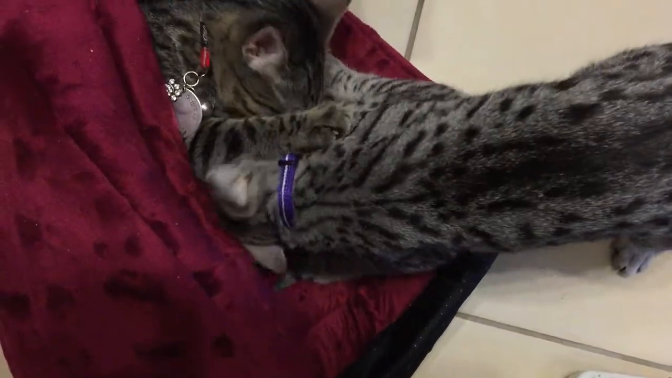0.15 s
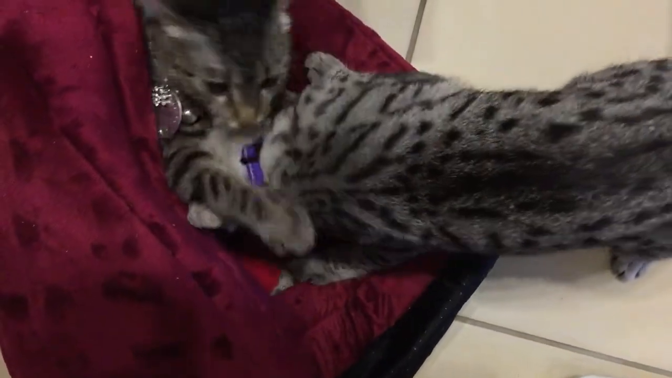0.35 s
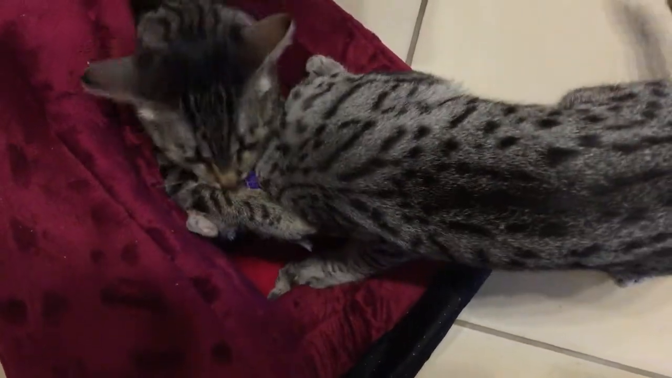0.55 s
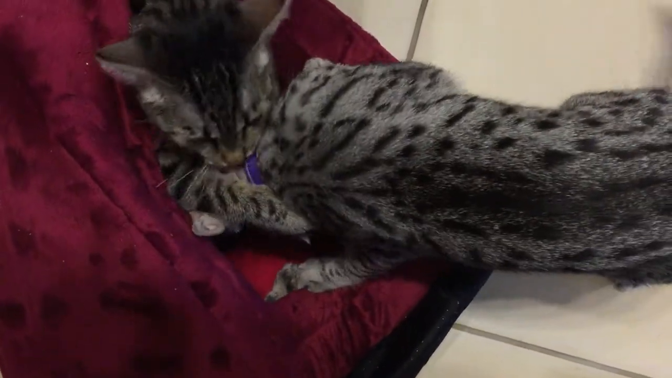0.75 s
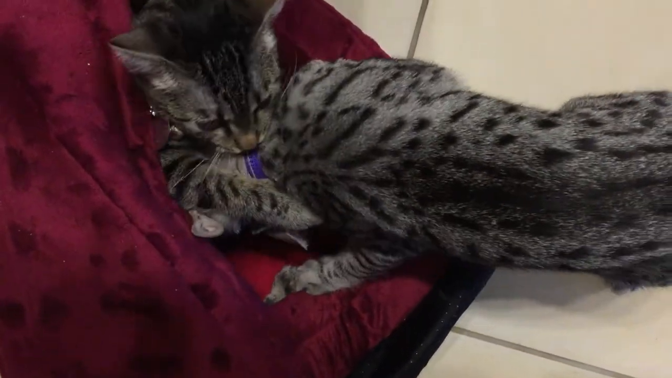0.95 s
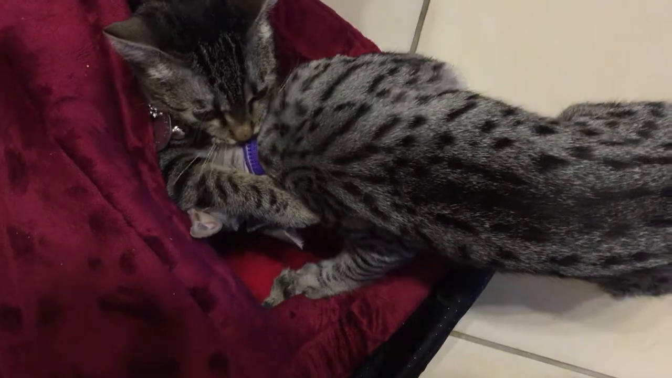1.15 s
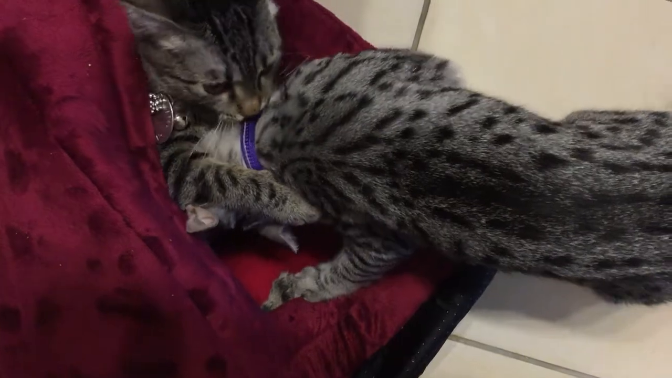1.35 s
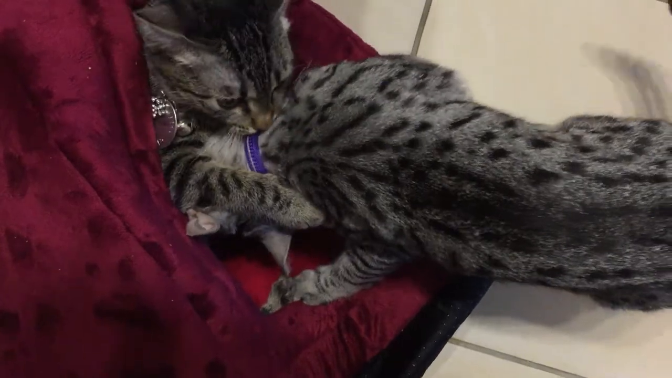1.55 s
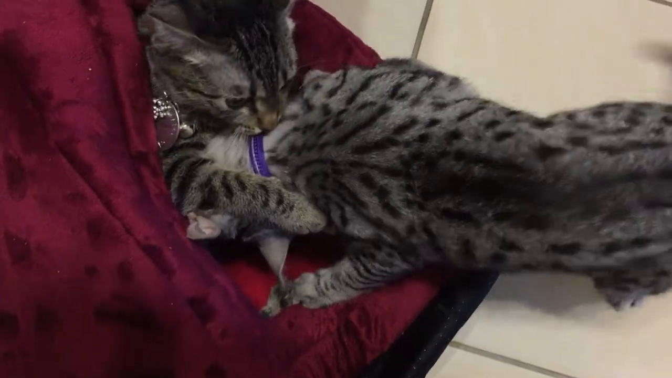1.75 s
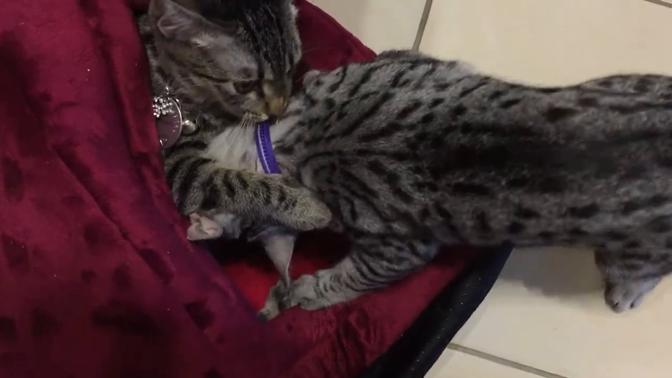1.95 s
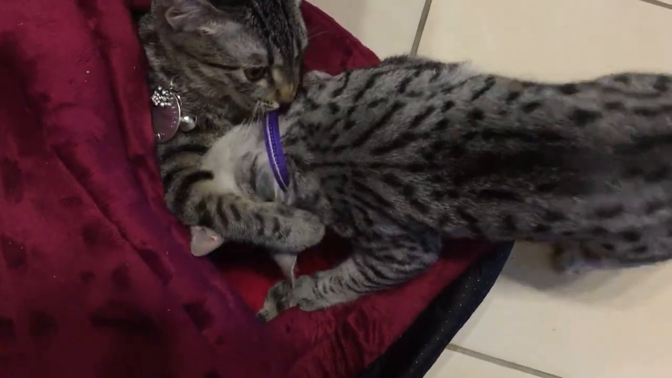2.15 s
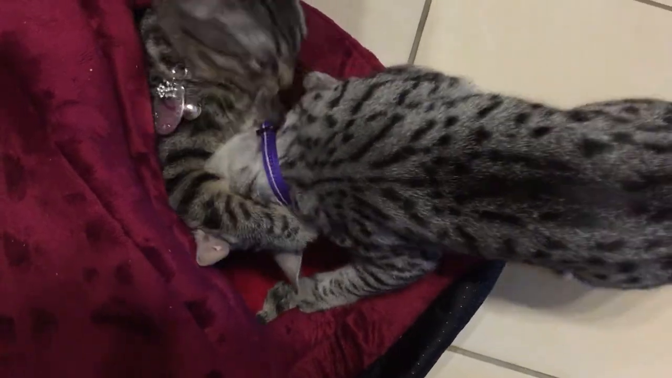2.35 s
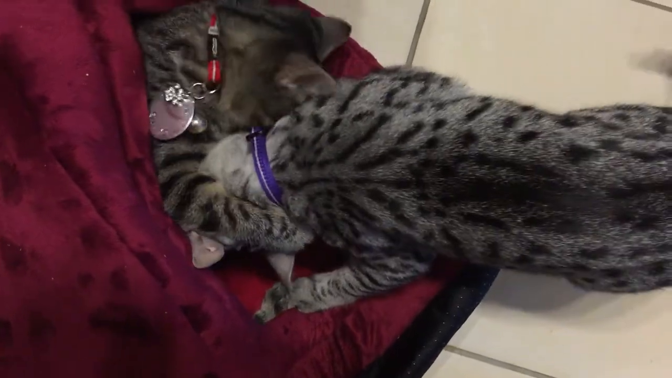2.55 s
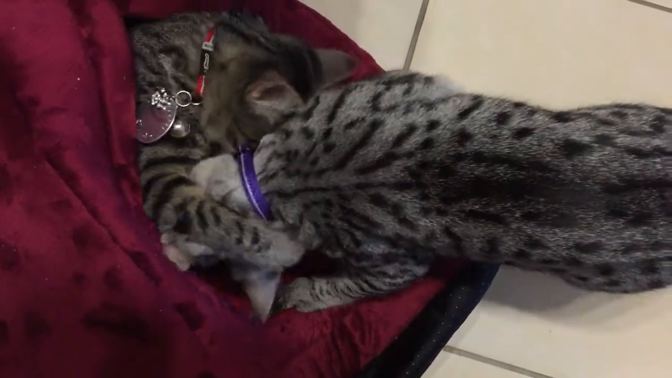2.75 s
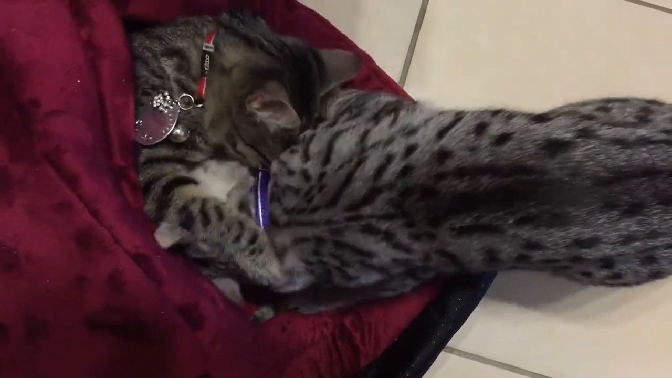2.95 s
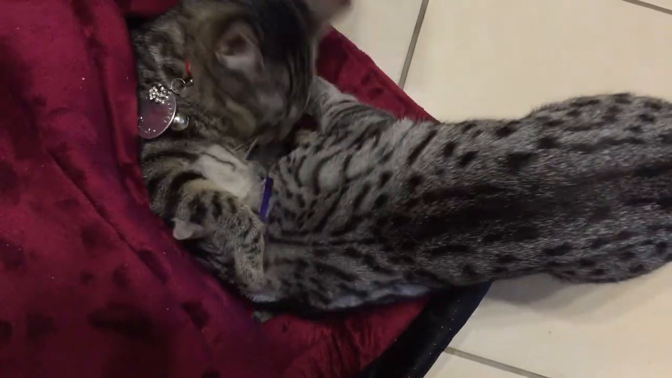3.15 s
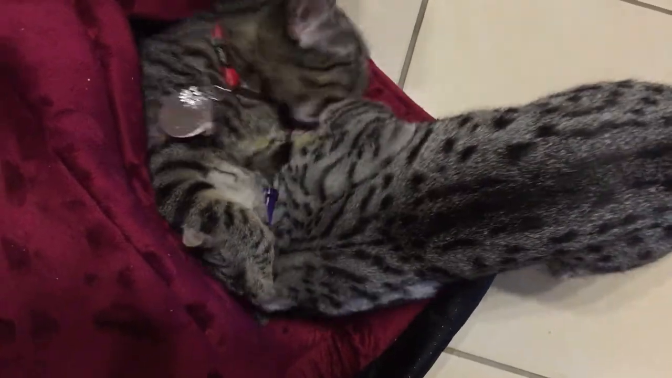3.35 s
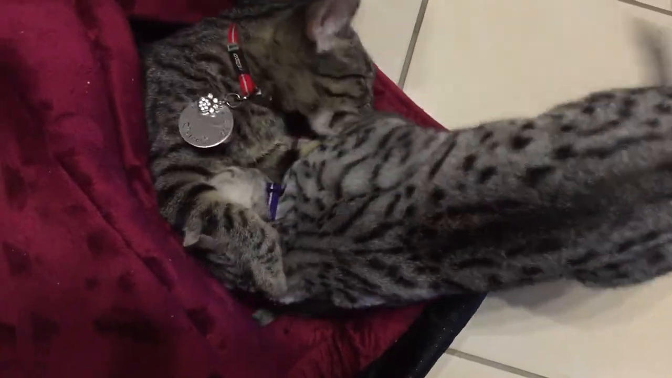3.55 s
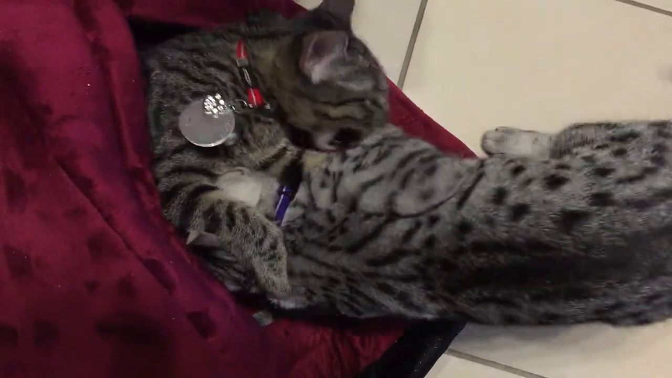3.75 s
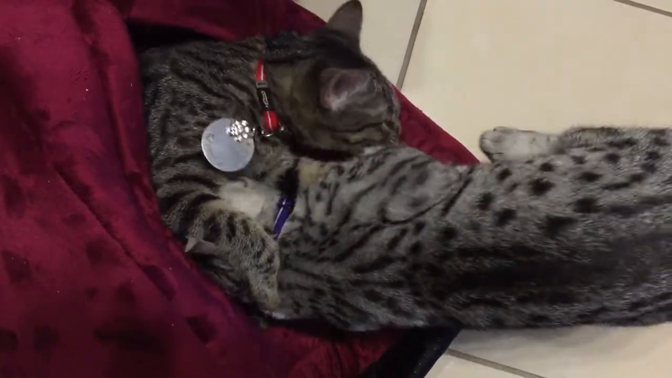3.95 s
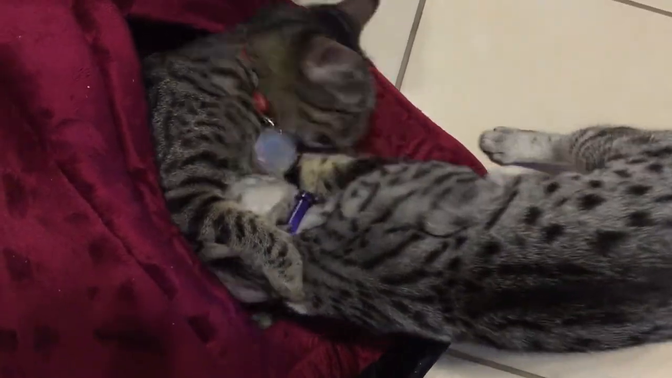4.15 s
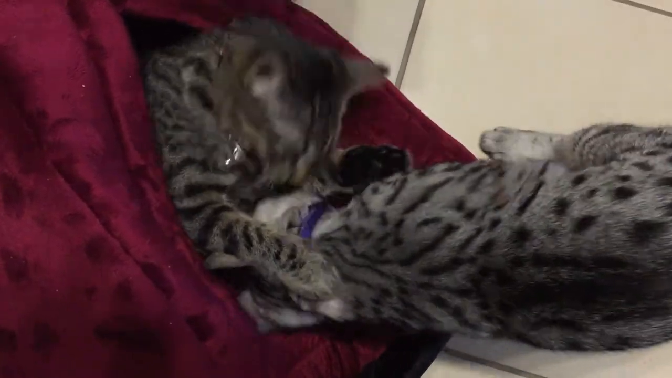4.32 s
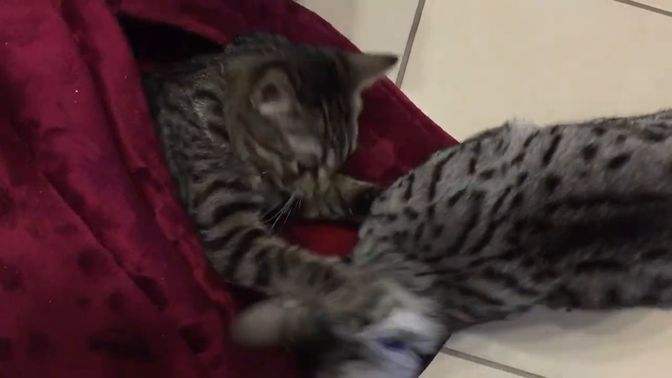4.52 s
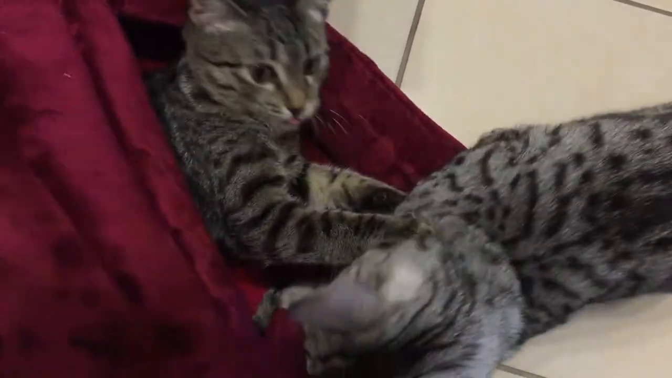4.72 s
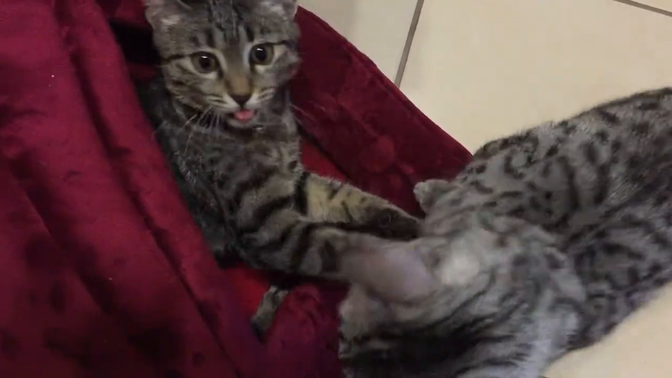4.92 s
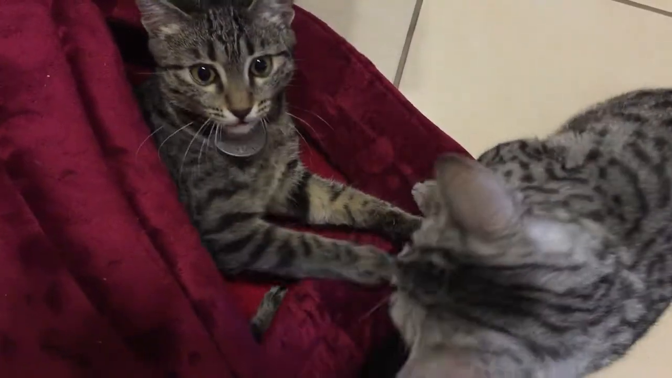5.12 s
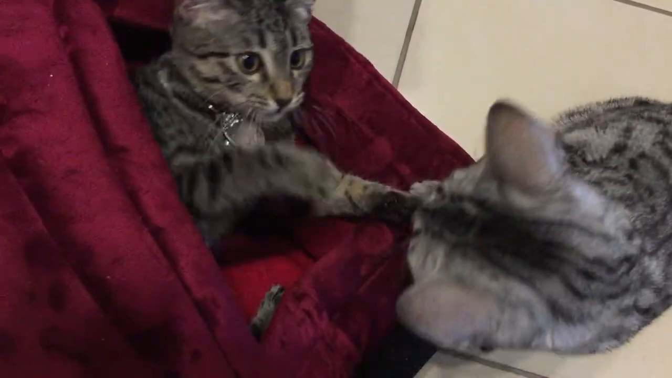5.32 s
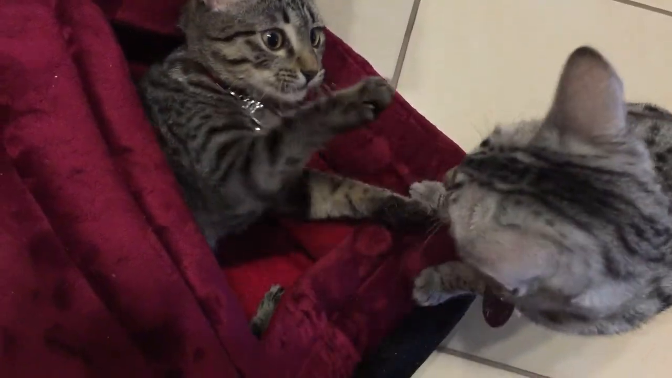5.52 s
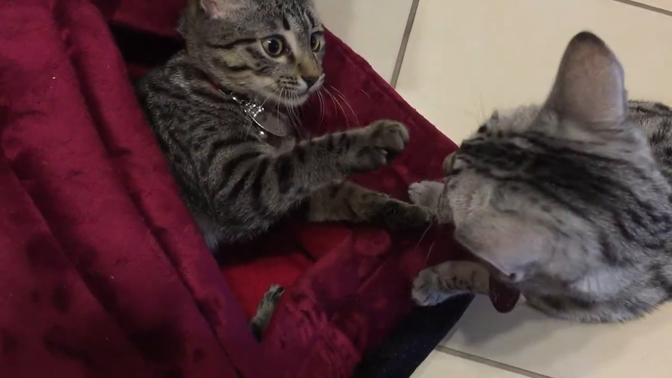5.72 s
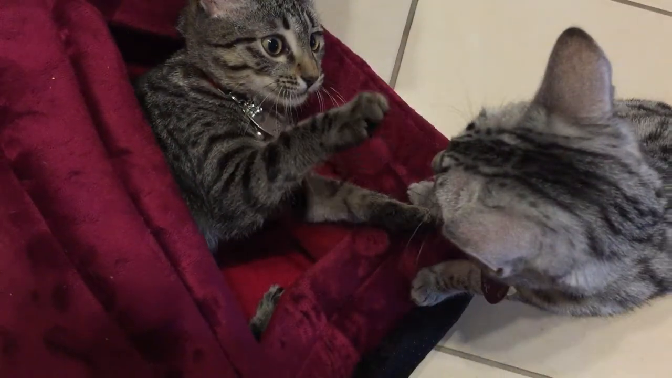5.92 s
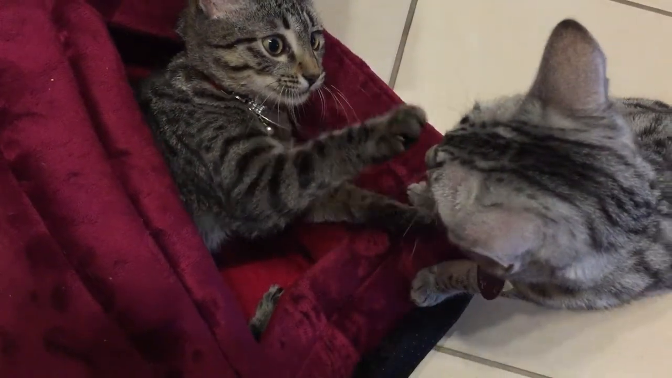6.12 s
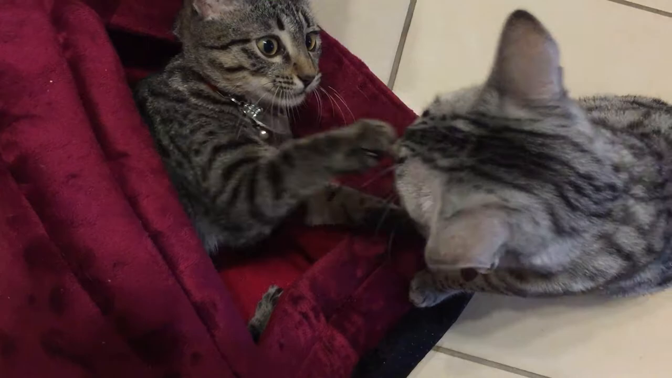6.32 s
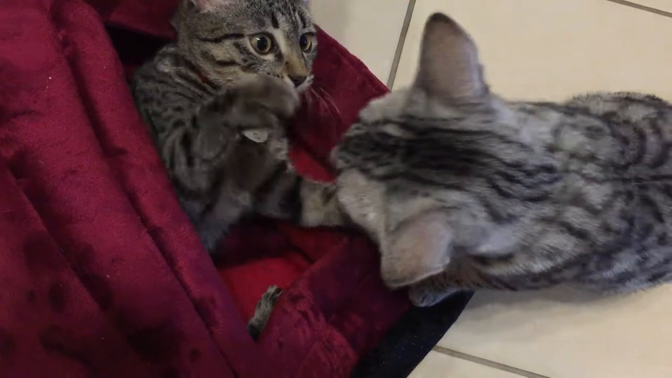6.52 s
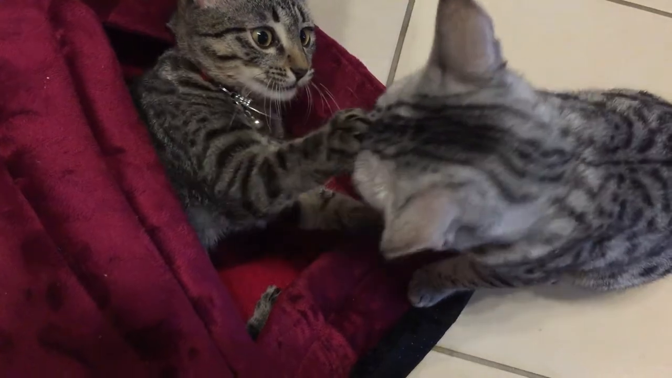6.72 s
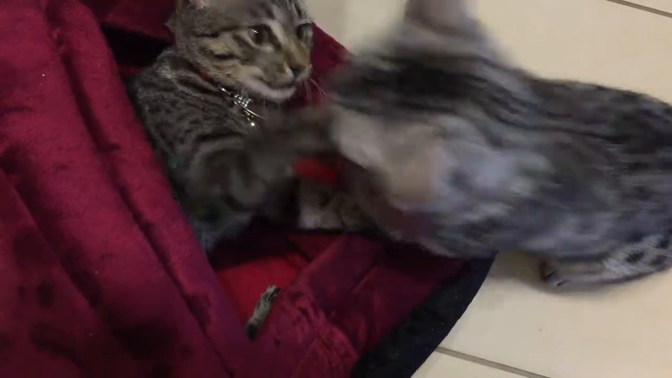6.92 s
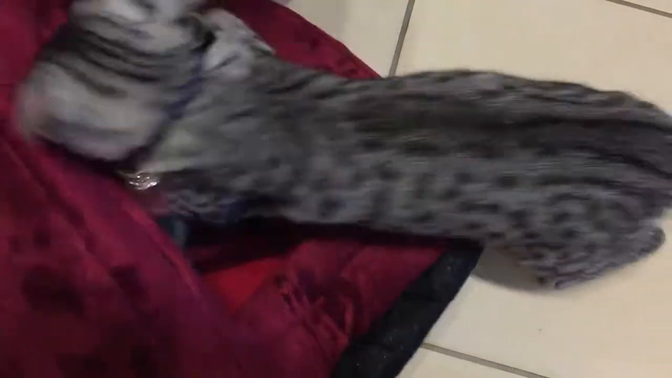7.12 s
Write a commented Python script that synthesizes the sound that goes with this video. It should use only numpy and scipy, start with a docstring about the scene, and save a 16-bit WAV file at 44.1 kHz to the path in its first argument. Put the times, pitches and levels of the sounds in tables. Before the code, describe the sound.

A quiet tiled room: low rumble, faint hiss and a steady, slightly wavering refrigerator hum throughout. Close to the microphone, a kitten's collar tag clinks thinly and very high at 0-0.2 s, then tag and small bell jingle together at 0.4-0.6 s, with a faint touch near 0.8. From about 1.6 s fur brushes plush and a soft, raspy low growl pulses; claws snap free of threads at 2.1 and 2.3. Light bell ticks start at 2.5, and a stronger growl runs from 2.7 to 3.4, opening brighter at its end. Tinkles and clinks gather at 3.5-3.8 around a soft paw pat. At 4.2-4.7 comes a dense, bright jangle with scratchy claw drags. Sparser bell notes and scuffs continue to 5.4, then mostly hum. Light tinkling at 6.8 leads to the loudest, sharpest collar rattle from 7.0 s to the end.

```python
"""Metal clinks and a small bell's jingle, close to the microphone: the collar of one of two kittens
wrestling in a plush cat bed on a tiled floor. Tag and bell are banks of ringing modes set off by clicks.
Claws and fur on the fabric are shaped noise; a low growl is slow pulses through throat resonances.
Behind them a refrigerator compressor hums in steady sines, over coloured noise for the room's rumble and hiss."""
import sys
import numpy as np
from scipy import signal
from scipy.fft import rfft, irfft
from scipy.io import wavfile

SR = 44100
rng = np.random.default_rng(int(sys.argv[2]) if len(sys.argv) > 2 else 0)


def master_out(mix):
    """Clip the mix to full scale and print it as 16-bit PCM to the path in sys.argv[1]."""
    frames = np.transpose(np.atleast_2d(mix))
    ceiling = np.clip(frames, -1, 1)
    pcm = np.round(ceiling * 32767).astype(np.int16)
    wavfile.write(sys.argv[1], SR, pcm)


N = 316197

# modes of the small steel bell: pitch_hz, relative level_db, t60_s
BELL = [(4339, 3, 0.041), (4430, 2, 0.07), (4530, 0, 0.045), (4920, -13, 0.025), (5100, -0.5, 0.01),
        (5580, -10.5, 0.077), (6500, -28, 0.059), (7500, -14, 0.047), (11350, -6, 0.068),
        (11570, -8, 0.049), (13000, -17, 0.074)]
# modes of the tag and its split ring: pitch_hz, relative level_db, t60_s
TAG = [(6600, -2.5, 0.006), (7020, -4, 0.0087), (13100, -2.5, 0.035), (13600, -17, 0.059),
       (13850, -15, 0.045), (14600, 5, 0.023), (14700, -9, 0.07), (15000, -28, 0.015)]
# colour of metal touching metal: frequency_hz, relative density_db (per Hz)
CONTACT = [(600, -54), (1500, -8.5), (2500, 0), (3600, -1), (5500, 4), (7000, 3), (9000, 8), (12000, -1),
           (15500, -40.5)]
BELL_HZ = 4457  # the bell's main note, before its spread from hit to hit


def from_db(db):
    """Decibels to amplitude gain."""
    return 10 ** (np.asarray(db) / 20)


def rms_one(x):
    """Scale to rms 1."""
    return x / np.sqrt(np.mean(x ** 2) + 1e-20)


def gains(rows):
    """One gain curve for each dB column, practically silent outside the rows."""
    s, *columns = np.transpose(rows)
    t = np.arange(N) / SR
    return np.array([from_db(np.interp(t, s, c, left=-150, right=-150)) for c in columns])


def noise(spectrum):
    """Steady noise of a given colour, rms 1."""
    hz, db = np.transpose(spectrum)
    bins = np.maximum(np.fft.rfftfreq(N, 1 / SR), 1)
    colour = from_db(np.interp(np.log(bins), np.log(hz), db))
    return rms_one(irfft(rfft(rng.standard_normal(N)) * colour, N))


def drift(rate):
    """Random wander of rms 1, with rate new values per second joined by straight lines."""
    knots = rng.standard_normal(4096)
    return rms_one(np.interp(np.arange(N) / SR * rate, np.arange(len(knots)), knots))


def bandpass(x, low_hz, high_hz):
    """Keep the band between two frequencies."""
    return signal.sosfilt(signal.butter(2, [low_hz, high_hz], "band", fs=SR, output="sos"), x)


def ring(clicks, hz, t60):
    """A damped mode: each unit click starts a sine of height 1 that falls 60 dB in t60 seconds."""
    r = from_db(-60 / (t60 * SR))
    w = 2 * np.pi * hz / SR
    return signal.lfilter([0, np.sin(w)], [1, -2 * r * np.cos(w), r * r], clicks + 1e-18)


def resonate(x, hz, width):
    """A resonance with gain 1 at its top; width in Hz."""
    r = np.exp(-np.pi * width / SR)
    feedforward = np.array([1, 0, -1]) * (1 - r * r) / 2
    feedback = [1, -2 * r * np.cos(2 * np.pi * hz / SR), r * r]
    return signal.lfilter(feedforward, feedback, x + 1e-18)


def die_away(clicks, seconds):
    """Each click becomes an exponential decay from its height, with this time constant."""
    return signal.lfilter([1], [1, -np.exp(-1 / (seconds * SR))], clicks + 1e-18)


def swell(start, length, attack, release):
    """An envelope that rises, holds until the length is over and dies away; all in seconds."""
    age = np.arange(N) / SR - start
    return np.clip(age / attack, 0, 1) * np.exp(-np.maximum(age - length, 0) / release)


def impulses(s, db):
    """One click for each event."""
    out = np.zeros(N)
    out[np.clip((s * SR).astype(int), 0, N - 1)] = from_db(db)
    return out


def bouncing(clicks, per_s, seconds):
    """The dying run of light touches that follows each hit."""
    return (rng.random(N) < per_s / SR) * die_away(clicks, seconds)


def grains(per_s, spread_db):
    """Random tiny touches of uneven size."""
    sizes = from_db(spread_db * np.minimum(rng.exponential(1, N), 3))
    return (rng.random(N) < per_s / SR) * sizes


def struck(clicks, modes, uneven_db):
    """Every touch lands on another spot, so each mode gets a strength and sign of its own."""
    at, out = np.flatnonzero(clicks), np.zeros(N)
    for hz, db, t60 in modes:
        strength = from_db(db + uneven_db * (2 * rng.random(len(at)) - 1.5))
        blows = np.zeros(N)
        blows[at] = clicks[at] * strength * rng.choice([-1, 1], len(at))
        out += ring(blows, hz, t60)
    return out


def spot_ring(times, levels_db, pitches_hz, seconds, cluster_s):
    """The partial each contact spot favours, fed by a quick cluster of touches and damped by fur."""
    out, age = np.zeros(N + SR), np.arange(SR // 5) / SR
    for s, db, hz in zip(times, levels_db, pitches_hz):
        cluster = rng.standard_normal(len(age)) * np.exp(-age / cluster_s)
        tone = ring(cluster, hz, seconds)
        start = int(s * SR)
        out[start:start + len(age)] += from_db(db) * tone / np.abs(tone).max()
    return out[:N]


def chatter(clicks, seconds, spread_db):
    """Bursts of metal-on-metal noise; each contact spot favours different frequency bands."""
    at, out = np.flatnonzero(clicks), np.zeros(N)
    hiss = noise(CONTACT)
    edges_hz = np.geomspace(1000, 16000, 17)
    for low, high in zip(edges_hz, edges_hz[1:]):
        blows = np.zeros(N)
        blows[at] = clicks[at] * from_db(spread_db * (2 * rng.random(len(at)) + 1))
        out += bandpass(hiss, low, high) * die_away(blows, seconds)
    return out


def fibres(s, db, hz, width, swell_s):
    """Fibres slip and give: a short swell of noise around one pitch."""
    out, age, start = np.zeros(N + SR), np.arange(SR // 4) / SR, int(s * SR)
    slip = resonate(resonate(rng.standard_normal(len(age)), hz, width), hz, 2 * width)
    envelope = age / swell_s * np.exp(1 - age / swell_s)  # peaks at 1 after swell_s
    out[start:start + len(age)] = from_db(db) * rms_one(slip) * envelope
    return out[:N]


def fibre_bands(events, bands, swell_s):
    """Each event makes fibres sound in several bands at once."""
    return sum(fibres(s, db + band_db, hz, width, swell_s) for s, db in events for hz, width, band_db in bands)


def room_air():
    """Low rumble of the house, swelling at the room's standing waves, under a faint hiss."""
    # colour of the rumble: frequency_hz, relative density_db (per Hz)
    rumble_colour = [(25, -27), (40, 0.5), (62, -14.5), (80, -0.5), (150, 0.5), (200, -3.5), (300, -11.5),
                     (450, -14), (750, -23), (1500, -39)]
    # colour of the hiss: frequency_hz, relative density_db (per Hz)
    air_colour = [(410, -17), (700, -10), (1400, -8.5), (2080, -10.5), (3030, -14), (3550, -5.5),
                  (3840, -15.5), (4860, -19.5), (5990, -18), (14600, -51), (16000, -13.5)]
    # standing waves: pitch_hz, width_hz, gain_db of the resonance
    room_modes = [(80.9, 2.2, 18), (104.6, 7.2, 17), (127.8, 9, 15), (144.1, 4.6, 8), (177.4, 15, 9),
                  (247, 2.4, 10.5)]
    rumble_db, air_db = -48.5, -68.5  # rms levels
    rumble = noise(rumble_colour)
    for hz, width, db in room_modes:
        rumble = rumble + from_db(db) * resonate(noise(rumble_colour), hz, width)
    rumble = signal.sosfilt(signal.butter(2, 55, "high", fs=SR, output="sos"), rumble)
    return from_db(rumble_db) * rms_one(rumble) + from_db(air_db) * noise(air_colour)


def refrigerator(waver=0.63):
    """Steady compressor tones, each wavering in phase (waver in radians rms)."""
    # compressor tones: pitch_hz, level_db (rms)
    hum_tones = [(538.3, -65.5), (586.8, -67), (1561, -91.5), (1760, -85), (1906, -83), (2003, -91),
                 (2051, -85.5), (2099, -97), (2880, -87.5), (3225, -90.5), (3273, -84.5), (3321, -100),
                 (3418, -75), (3467, -97), (3515, -78.5), (3564, -80.5), (3612, -79), (3661, -77),
                 (4005, -99), (4054, -92), (4151, -89), (5814, -87)]
    t = np.arange(N) / SR
    out = np.zeros(N)
    for hz, db in hum_tones:
        phase = 2 * np.pi * (hz * t + rng.random()) + waver * drift(16)
        out += from_db(db) * np.sqrt(2) * np.sin(phase)
    return out


def rubbing(rub_db=-2):
    """Soft friction of fur on plush, with a slightly uneven grip."""
    # fur strokes along the plush: start_s, length_s, level_db before rub_db
    strokes = [(1.633, 0.042, -61), (1.812, 0.21, -69), (2.04, 0.11, -60.5), (2.246, .1, -70),
               (2.9, 0.054, -67), (3.097, 0.19, -69)]
    # colour of fur on plush: frequency_hz, relative density_db (per Hz)
    plush = [(700, -16), (1000, -12), (1140, 6.5), (1280, -1), (1450, 2.5), (1850, -5), (2300, -18),
             (5000, -22), (15000, -35)]
    attack_s, release_s = 0.046, 0.074
    pressure = sum(from_db(db) * swell(s, length, attack_s, release_s) for s, length, db in strokes)
    grip = from_db(1.8 * drift(70))
    return pressure * from_db(rub_db) * grip * noise(plush)


def scuffs(scuff_db=-8, snap_db=-8, pat_db=-8):
    """Claws drag over the fabric and snap free of threads, a paw lands: swells of noise in bands."""
    # claw drags: start_s, level_db before scuff_db, pitch_hz, width_hz, swell_s
    claw_drags = [(1.29, -67, 7000, 5000, .013), (1.675, -58, 4970, 5000, .012),
                  (2.36, -54.5, 3600, 2460, 0.011), (4.171, -42, 7200, 893, 0.019),
                  (4.191, -54, 2960, 1200, .012), (4.217, -50, 2620, 400, .012),
                  (4.277, -39.5, 2450, 249, .007), (4.79, -53.5, 2500, 2000, 0.02),
                  (5.291, -51.5, 980, 696, .0075)]
    # a claw snaps free of a thread: start_s, level_db before snap_db
    claw_snaps = [(2.127, -32), (2.3243, -35.5)]
    # bands of a snap: pitch_hz, width_hz, relative level_db
    snap_bands = [(3300, 510, 1), (1410, 2400, -13.5), (8100, 5500, -14)]
    # a paw lands on the cushion: start_s, level_db before pat_db
    paw_pats = [(3.69, -40)]
    # bands of the cushion: pitch_hz, width_hz, relative level_db
    pat_bands = [(420, 130, 1.5), (1166, 83, -7.5), (1800, 1200, -13)]
    drags = sum(fibres(*row) for row in claw_drags)
    snaps = fibre_bands(claw_snaps, snap_bands, swell_s=0.0011)
    pats = fibre_bands(paw_pats, pat_bands, swell_s=0.0051)
    return from_db(scuff_db) * drags + from_db(snap_db) * snaps + from_db(pat_db) * pats


def cavity(source, resonances):
    """Parallel resonances of alternating sign."""
    return sum((-1) ** k * from_db(db) * resonate(source, hz, width)
               for k, (hz, width, db) in enumerate(resonances))


def growl(chest_db=-1, mouth_db=-2, pulse_hz=54.4, jitter=.1, rasp=1.4):
    """Slow uneven vocal fold pulses and their rasp boom in the throat; the opening mouth brightens them."""
    # a soft growl, then a stronger one that opens at its end:
    # time_s, chest level_db before chest_db, open mouth level_db before mouth_db
    growl_levels = [(1.55, -72, -75), (1.69, -52, -58.5), (1.78, -59, -71), (2.12, -61, -59.5),
                    (2.22, -60, -70), (2.45, -55.5, -62.5), (2.62, -57.5, -71), (2.73, -49.5, -71),
                    (2.84, -60, -74), (2.94, -45, -67), (3.12, -48, -62.5), (3.31, -46.5, -53.5),
                    (3.42, -56, -68), (3.5, -58.5, -76)]
    # throat resonances: pitch_hz, width_hz, relative level_db
    throat = [(220, 105, 6), (347, 106, -6.5)]
    # resonances of the open mouth: pitch_hz, width_hz, relative level_db
    open_mouth = [(630, 63, 16), (670, 90, -18), (850, 37, -15)]
    chest, mouth = gains(growl_levels)
    cycles = np.cumsum(pulse_hz * (1 + jitter * drift(40))) / SR
    pulses = np.diff(np.floor(cycles), prepend=0)  # one click per whole cycle
    breath = die_away(pulses, 0.054) * rng.standard_normal(N)
    source = rms_one(pulses) + rasp * rms_one(breath)
    low = bandpass(cavity(source, throat), 160, 460)
    high = bandpass(cavity(source, open_mouth), 500, 1100)
    return chest * from_db(chest_db) * rms_one(low) + mouth * from_db(mouth_db) * rms_one(high)


def tinkles(spot_db=-3, modes_db=-14):
    """Light taps of the pellet at uneven intervals, each on another spot of the bell."""
    # a wriggling cat rolls the pellet about: start_s, end_s, level_db before spread and layer gains
    wriggles = [(2.92, 3.28, -55), (3.575, 3.72, -57), (5.102, 5.3, -59), (6.88, 7.0, -54)]
    taps_per_s, pitch_scatter, spread_db = 12, 0.015, 0.5  # pitch_scatter is a share of the note
    taps = [(t, db) for start, end, db in wriggles for t in np.arange(start, end, 1 / taps_per_s)]
    s, level = np.transpose(taps)
    late, louder, higher = np.tanh(rng.standard_normal((len(s), 3))).T  # each within -1 to 1
    s = s + .5 * late / taps_per_s
    level = level + spread_db * louder
    hz = BELL_HZ * (1 + pitch_scatter * higher)
    note = spot_ring(s, level, hz, seconds=0.067, cluster_s=0.0096)
    shell = struck(impulses(s, level), BELL, uneven_db=6)
    return from_db(spot_db) * note + from_db(modes_db) * shell


def jingles(modes_db=-14, bounce_db=-3, spot_db=-3, click_db=-30, pitch_scatter=0.018):
    """The pellet ticks against the bell, bounces a few times and sets it ringing."""
    # the pellet hits the wall of the bell: start_s, level_db before the layer gains
    pellet_hits = [(.0368, -72), (.4402, -44), (0.483, -37.5), (0.5636, -40), (.7874, -62), (2.529, -56),
                   (2.665, -47), (2.727, -51), (2.868, -52), (3.3053, -53.5), (3.3392, -46.5),
                   (3.557, -45.5), (3.7373, -42.5), (4.0747, -44), (4.137, -47), (4.2359, -30.5),
                   (4.333, -34.5), (4.363, -37.5), (4.4148, -35.5), (4.526, -46), (4.799, -41),
                   (4.8836, -44.5), (5.0699, -43), (5.1226, -50), (5.156, -40.5), (5.2758, -50),
                   (6.8259, -48.5), (7.021, -34.5), (7.0497, -27.5)]
    s, level = np.transpose(pellet_hits)
    hits = impulses(s, level)
    touches = hits + from_db(bounce_db) * bouncing(hits, per_s=700, seconds=0.016)
    shell = from_db(modes_db) * struck(touches, BELL, uneven_db=6)
    hz = BELL_HZ * (1 + pitch_scatter * rng.standard_normal(len(s)))
    note = from_db(spot_db) * spot_ring(s, level, hz, seconds=0.049, cluster_s=0.0071)
    tick = from_db(click_db) * die_away(hits, 0.024) * noise(CONTACT)
    return shell + note + tick


def rattle(bell_db=-2, tag_db=-2, scrape_db=-1):
    """While the collar shakes, many light touches fall on bell and tag; the sliding tag also scrapes."""
    # a lunge shakes the collar, the pellet rolls and the tag slides:
    # start_s, length_s, bell level_db before bell_db, tag level_db before its layer gains
    shakes = [(0, 0.027, -49, -54.5), (0.175, 0.069, -68, -70.5), (0.371, 0.093, -57.5, -57),
              (0.47, 0.018, -56, -72), (0.564, 0.1, -73, -78), (0.769, 0.064, -66.5, -74.5),
              (3.532, 0.22, -65.5, -70.5), (4.171, 0.054, -73, -52.5), (4.207, 0.016, -67, -51),
              (4.285, .14, -52.5, -68), (4.54, .12, -68, -62.5), (4.782, 0.11, -48.5, -60),
              (5.117, 0.053, -75, -64), (7.016, 0.18, -44.5, -45.5)]
    attack_s, release_s = 0.0085, 0.036
    shapes = [swell(s, length, attack_s, release_s) for s, length, _, _ in shakes]
    bell, tag = from_db(np.array(shakes)[:, 2:]).T @ np.array(shapes)
    rolling = from_db(bell_db) * rms_one(struck(grains(450, 1.7), BELL, uneven_db=5))
    sliding = from_db(tag_db) * rms_one(struck(grains(450, 2.2), TAG, uneven_db=6))
    grit = rms_one(chatter(grains(700, 3.6), seconds=.0012, spread_db=6))
    return bell * rolling + tag * (sliding + from_db(scrape_db) * grit)


def clinks(click_db=-13, chatter_db=-24, modes_db=-15, bounce_db=-3, ring_db=-5, spot_db=-4):
    """A knock is a click with a brief chatter; the tag bounces and rings together with its split ring."""
    # the tag knocks on its split ring, levels before the layer gains:
    # start_s, tag level_db, tag pitch_hz, split ring level_db, contact click level_db
    knocks = [(0.0146, -35, 14400, -39, -52), (0.0355, -48, 14400, -34, -57),
              (0.0939, -42, 14400, -36.5, -61), (.1755, -27, 14600, -41, -49),
              (.393, -37, 14200, -29.5, -54), (0.44, -30.5, 14400, -29, -53),
              (0.5624, -38, 14300, -57, -31), (2.2069, -55, 14700, -70, -48.5),
              (2.36, -50, 13100, -67, -44), (2.903, -35.5, 14400, -46.5, -41),
              (3.028, -51, 14200, -50.5, -68), (3.5413, -46, 13700, -42.5, -49),
              (3.6138, -39, 14370, -36, -54), (3.652, -46, 14100, -39.5, -62),
              (3.691, -40, 14400, -55, -48), (3.7382, -34.5, 14250, -60, -44),
              (3.774, -45, 14400, -51, -41), (4.1918, -31, 14600, -41, -43),
              (4.2365, -22.5, 13150, -43, -38), (4.2743, -26, 12700, -58, -52),
              (4.2832, -39, 14600, -55, -28), (4.289, -29, 14200, -52, -39),
              (4.3316, -29, 14500, -31, -29.5), (4.3617, -26, 14400, -34, -30.5),
              (4.398, -33, 13200, -32, -53), (4.495, -52, 14500, -40, -41.5),
              (4.5274, -16.5, 14500, -48, -28), (4.6155, -22, 14640, -32, -36),
              (4.675, -31.5, 14400, -55, -46), (5.1582, -32.5, 13500, -59, -51),
              (5.245, -41, 13100, -72, -69), (5.3734, -47.5, 14800, -59, -60),
              (5.415, -56, 13900, -70, -57.5), (6.9244, -46, 14300, -63, -50),
              (7.0214, -33, 14310, -36, -34), (7.0508, -14.5, 14400, -26, -26.5),
              (7.0568, -10, 14600, -30, -21), (7.1187, -20.5, 14400, -35, -34),
              (7.1554, -26, 14300, -27, -29), (7.1614, -13.5, 14300, -19, -25.5)]
    split_ring_hz, pitch_scatter = 6690, 0.03  # its note, and the spread over contact spots as a share
    s, tag_level, tag_hz, ring_level, click_level = np.transpose(knocks)
    click, tag = impulses(s, click_level), impulses(s, tag_level)
    contact = from_db(click_db) * die_away(click, 0.00077) * noise(CONTACT)
    contact += from_db(chatter_db) * chatter(click, seconds=0.0082, spread_db=8.5)
    touches = tag + from_db(bounce_db) * bouncing(tag, per_s=700, seconds=0.0047)
    plate = from_db(modes_db) * struck(touches, TAG, uneven_db=7)
    plate += from_db(spot_db) * spot_ring(s, tag_level, tag_hz, seconds=0.018, cluster_s=0.0027)
    ring_hz = split_ring_hz * (1 + pitch_scatter * rng.standard_normal(len(s)))
    split_ring = from_db(ring_db) * spot_ring(s, ring_level, ring_hz, seconds=0.0044, cluster_s=0.01)
    return contact + plate + split_ring


def room(x, wet_db=-15, t60_s=0.45):
    """A weak diffuse tail from tiles and walls: decaying noise that starts 4 ms after the direct sound."""
    age = np.arange(SR // 2) / SR
    tail = rng.standard_normal(len(age)) * from_db(-60 * age / t60_s) * (age > .004)
    return x + from_db(wet_db) * signal.fftconvolve(x, tail / np.linalg.norm(tail))[:N]


def scene():
    """The cats close by, the room behind them."""
    cats = clinks() + jingles() + tinkles() + rattle() + scuffs() + rubbing() + growl()
    return (room(cats) + refrigerator() + room_air())[None]


def record(dry):
    """The treble is cut steeply above 15.4 kHz by an elliptic low-pass."""
    return signal.sosfilt(signal.ellip(10, .2, 70, 15400, fs=SR, output="sos"), dry)


dry = scene()
out = record(dry)
master_out(out)
```